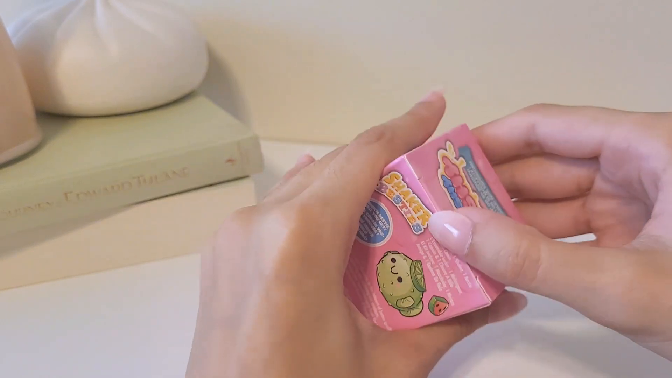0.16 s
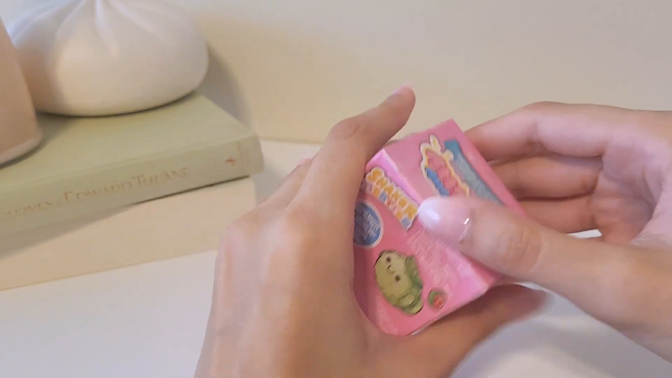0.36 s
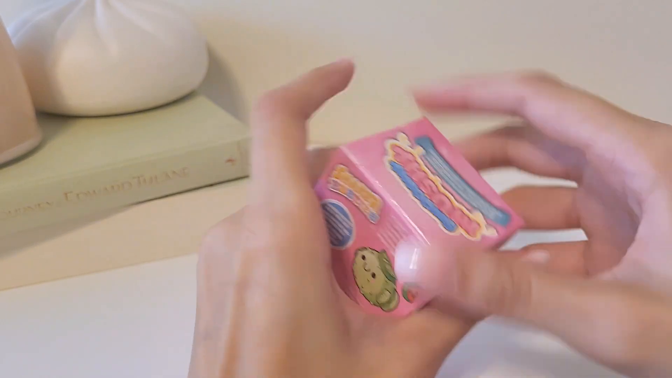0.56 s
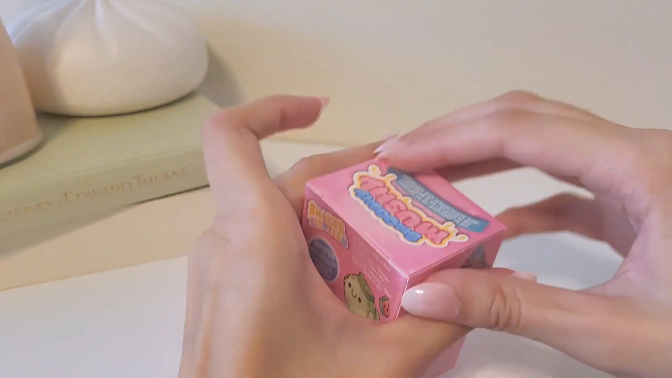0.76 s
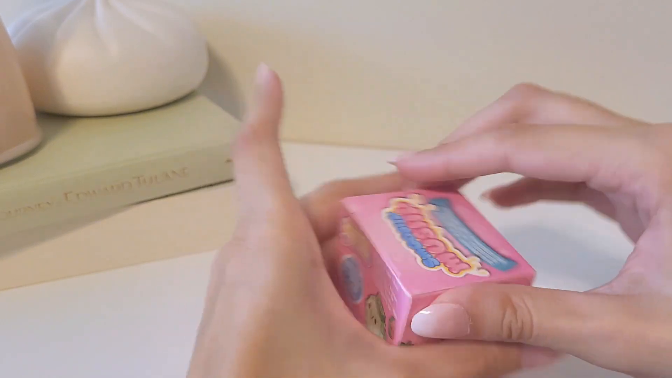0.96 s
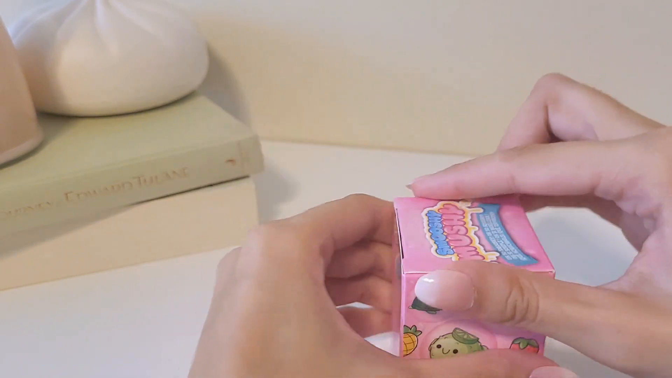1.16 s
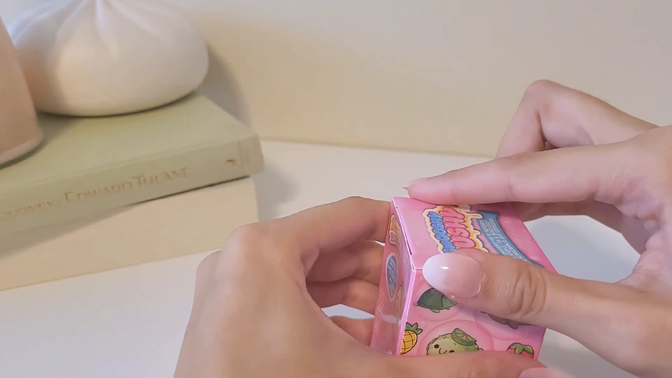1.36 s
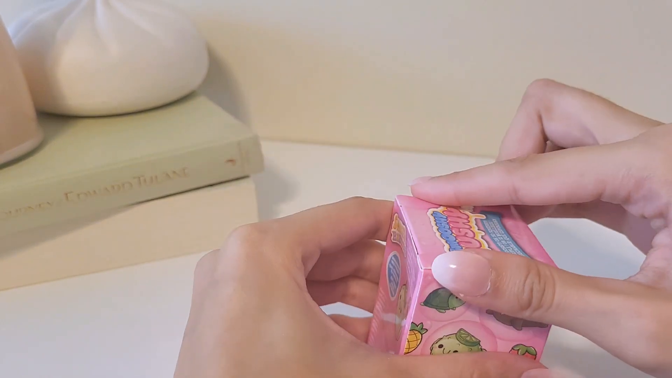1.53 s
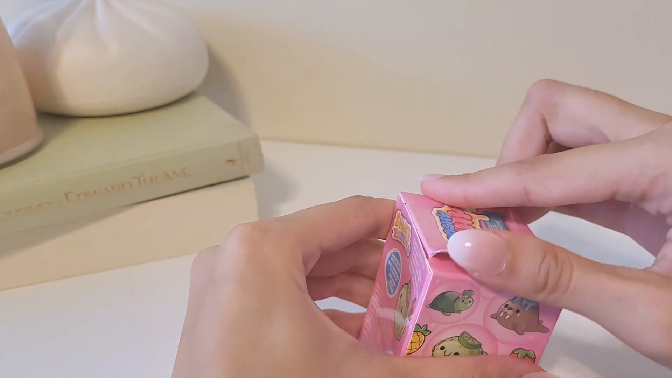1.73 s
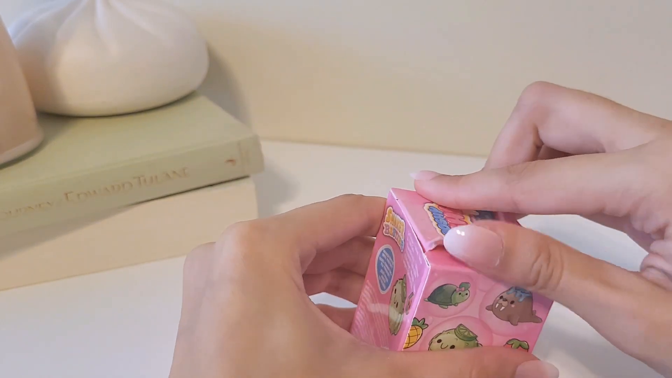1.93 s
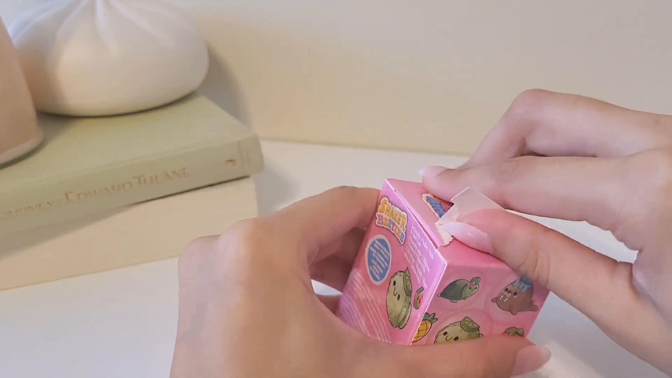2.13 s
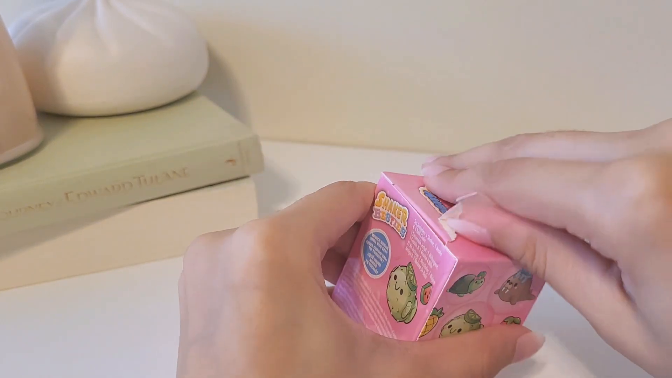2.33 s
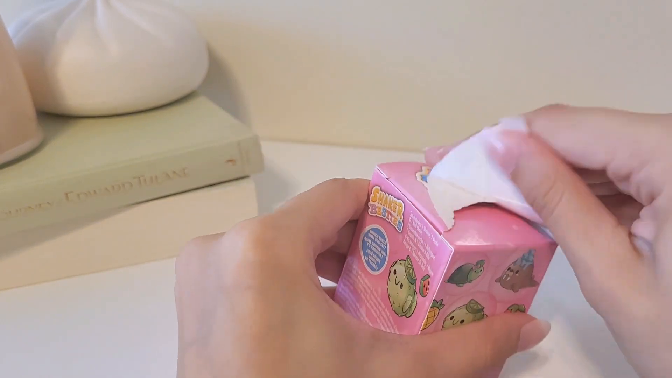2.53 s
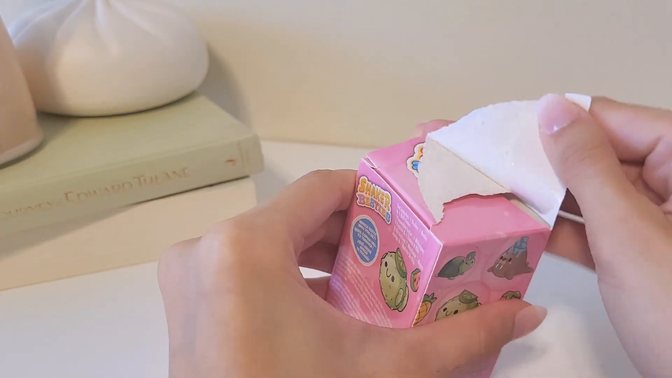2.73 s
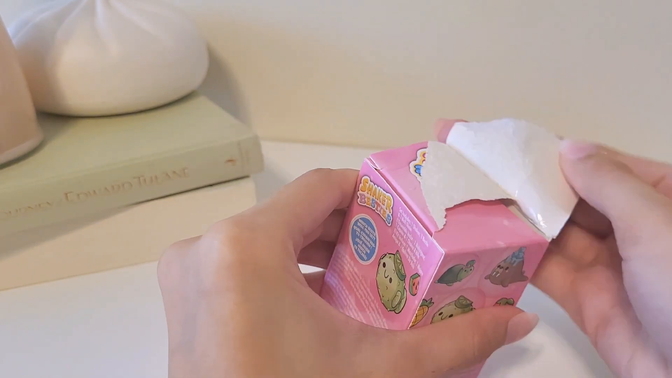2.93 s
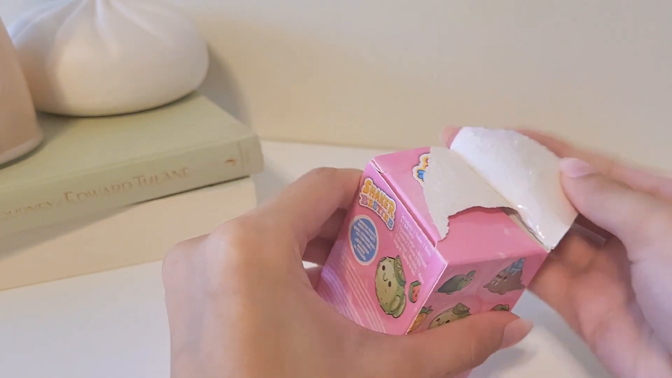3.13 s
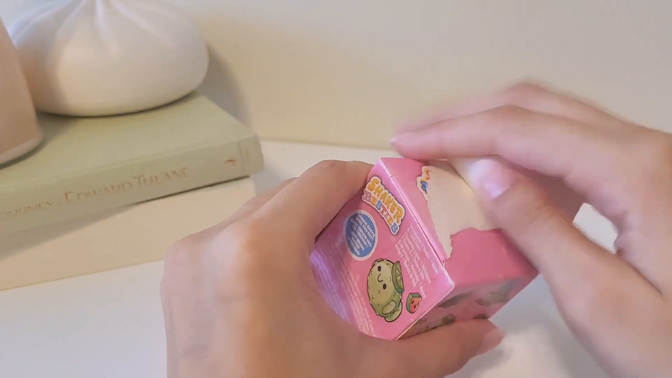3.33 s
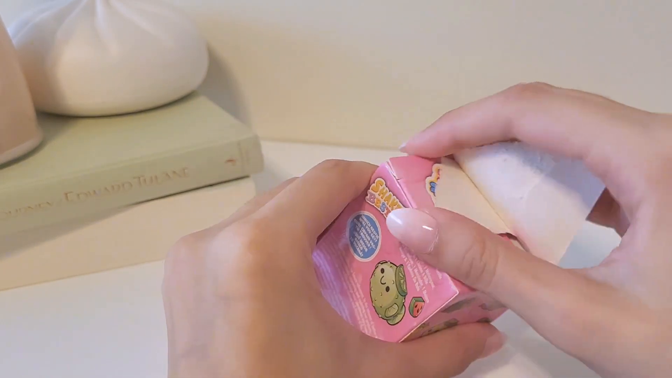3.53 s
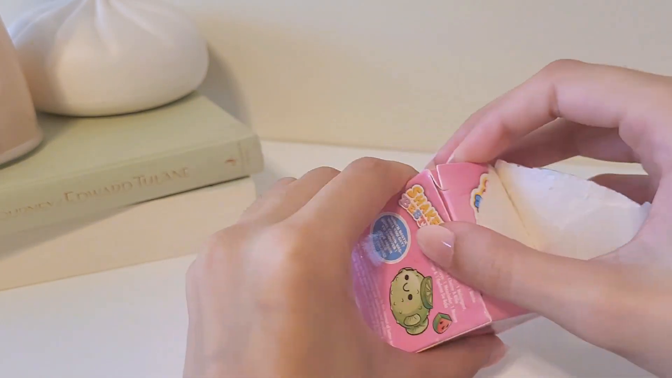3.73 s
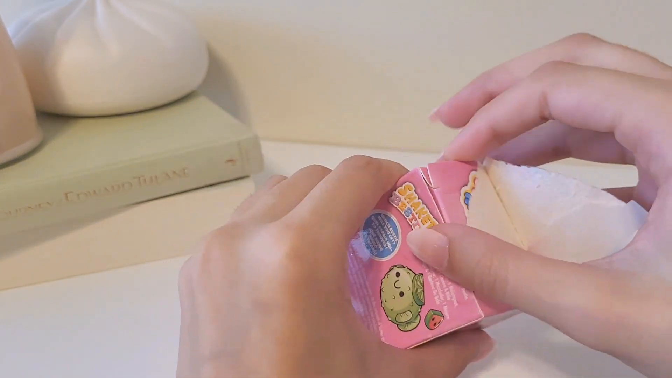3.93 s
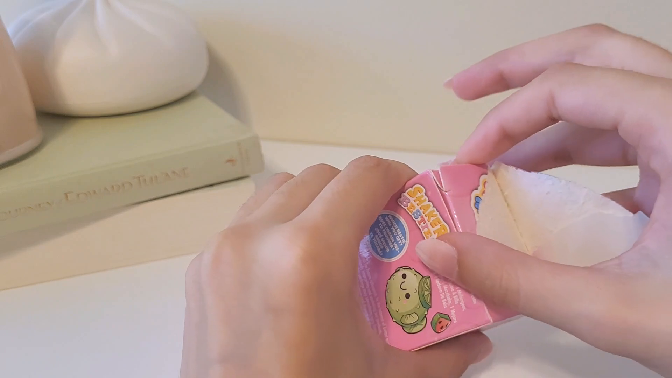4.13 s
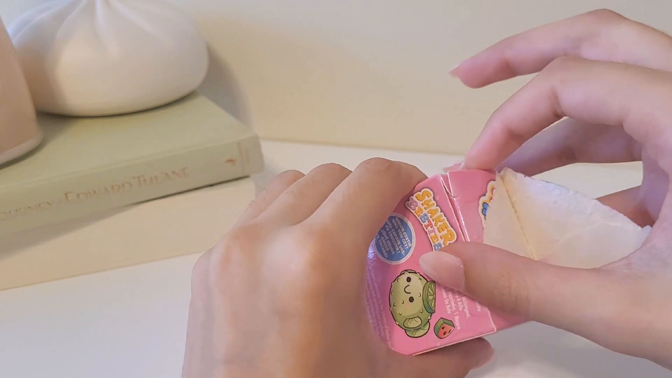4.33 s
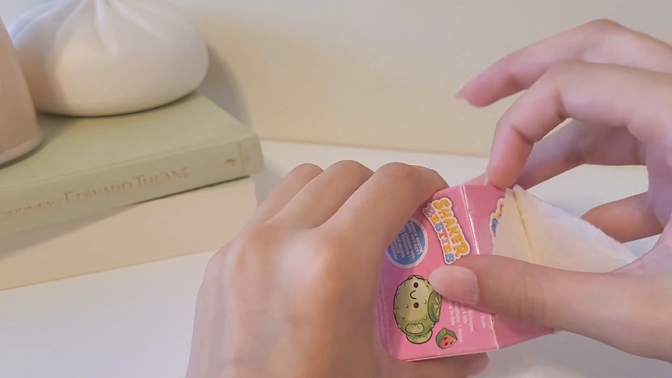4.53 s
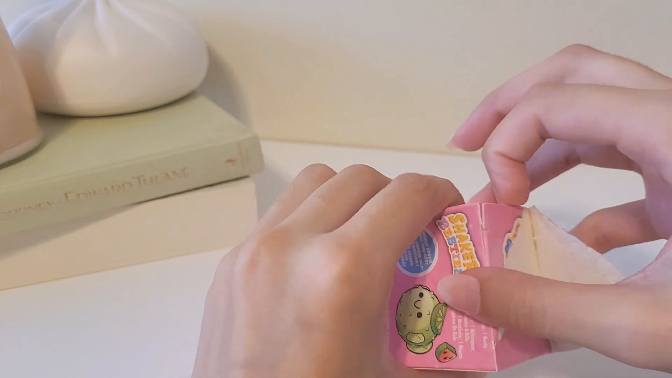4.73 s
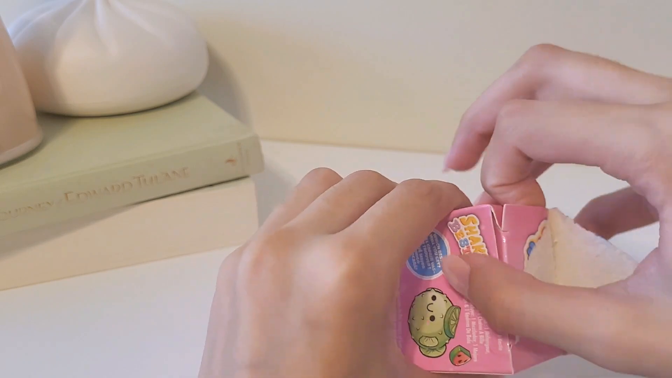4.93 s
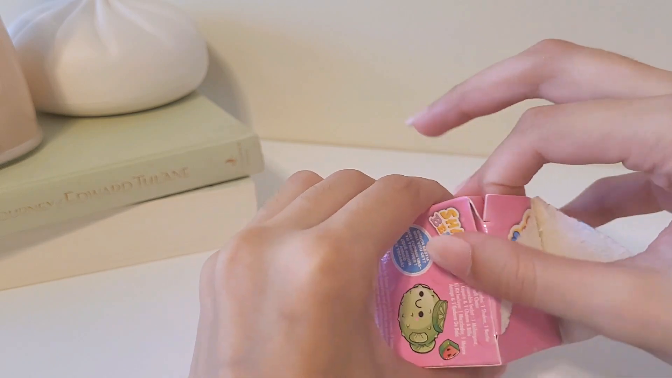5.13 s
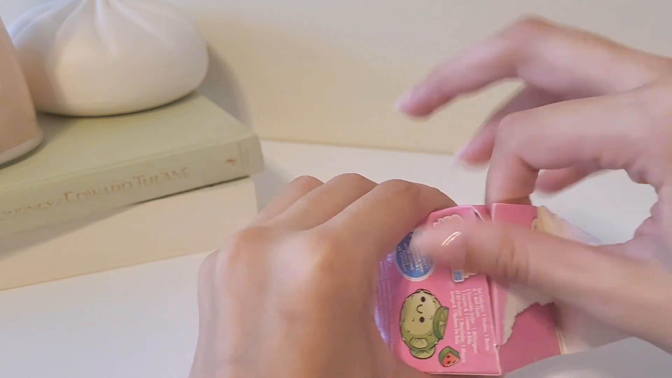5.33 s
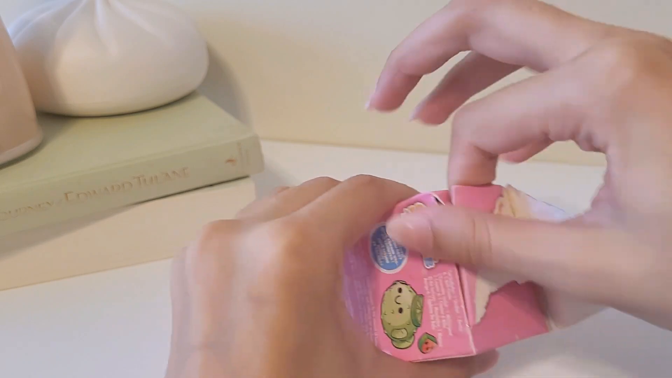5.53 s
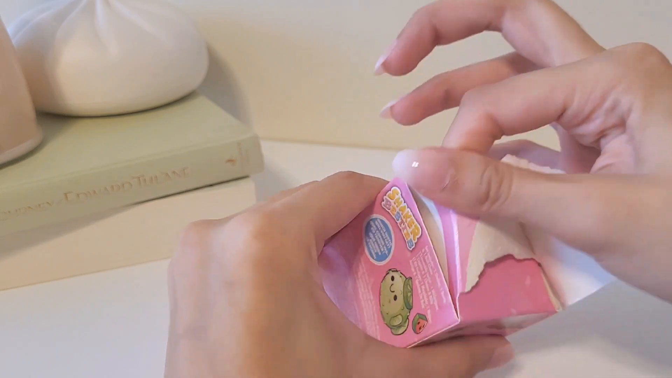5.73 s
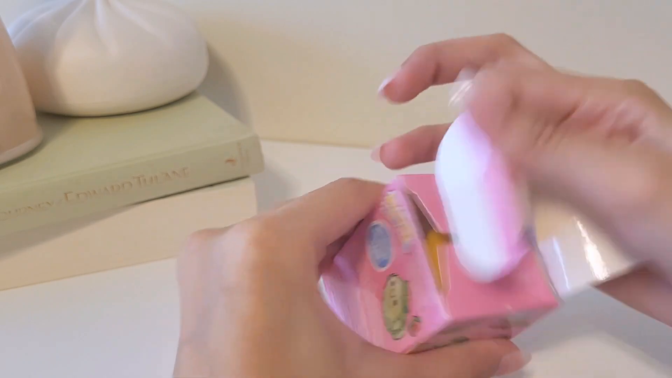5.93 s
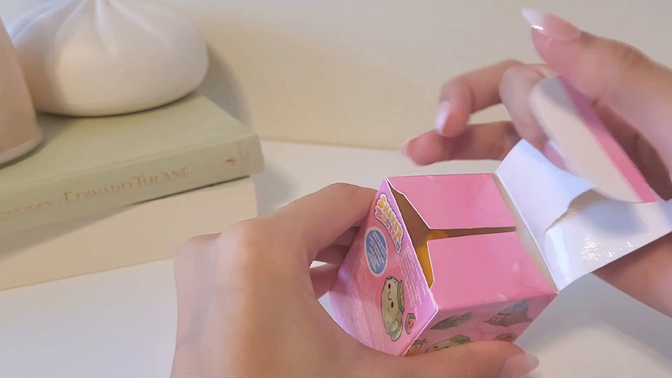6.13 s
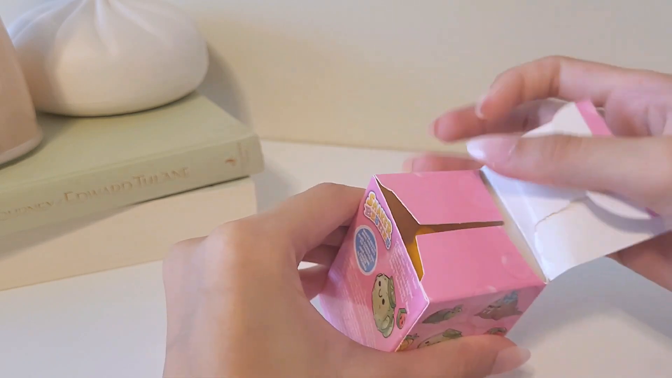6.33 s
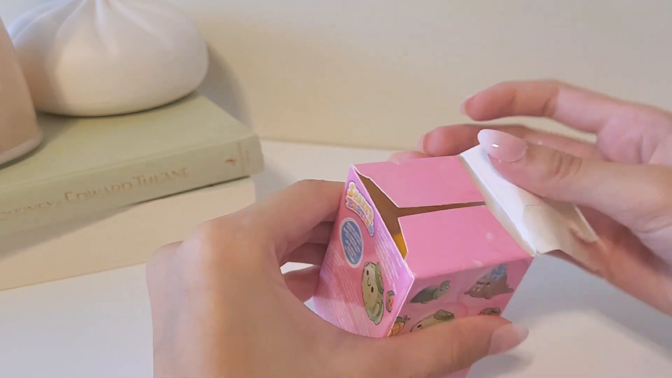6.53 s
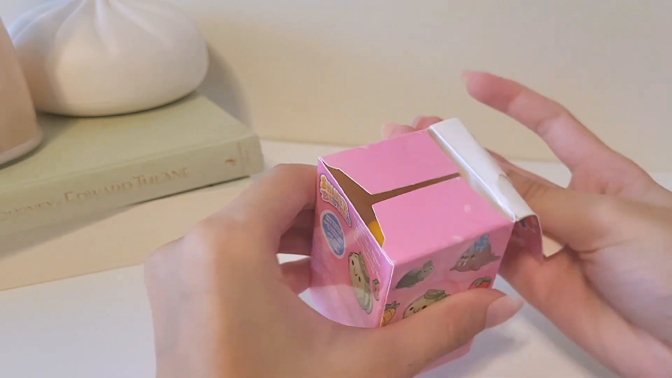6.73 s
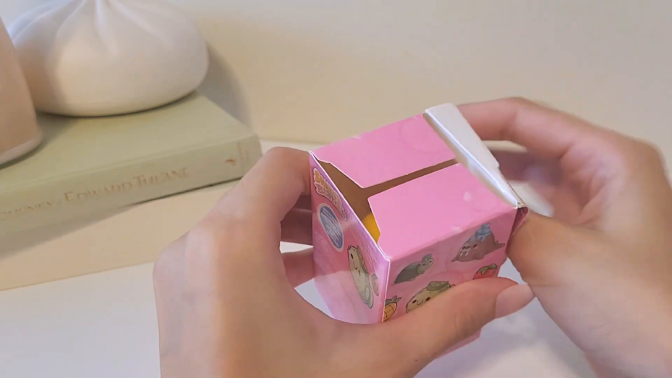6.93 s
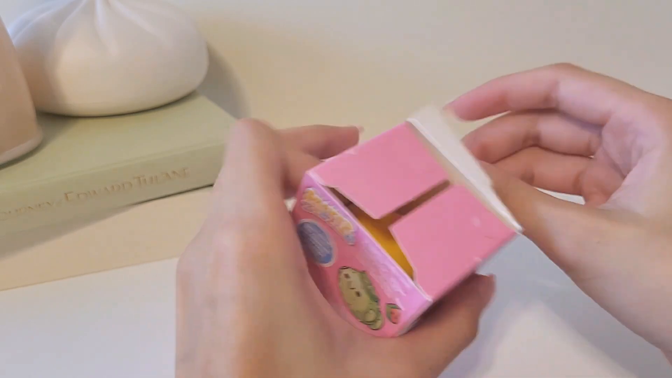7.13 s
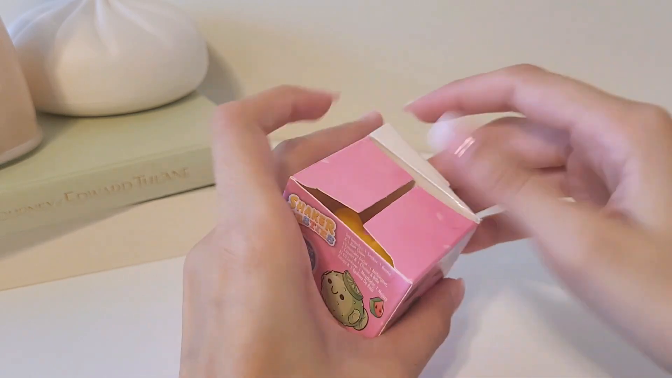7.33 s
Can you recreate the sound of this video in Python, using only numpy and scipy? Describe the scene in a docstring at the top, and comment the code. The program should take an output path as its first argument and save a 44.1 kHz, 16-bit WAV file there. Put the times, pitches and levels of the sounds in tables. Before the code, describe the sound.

Fingers tap and rub a small hollow cardboard box up close, tearing it with two short crackling rips, over faint low rumble and hiss.

```python
"""A far engine gains speed over the first two seconds, over low rumble and faint hiss that run throughout.
Meanwhile fingers tap and rub a small hollow cardboard box close to a stereo microphone in a quiet room.
A crackling rip follows from about 2.3 s, then more taps and rubs, a second rip from 5.5 s, and late taps.
Each contact is noise shaped by an envelope: it rings the air and walls of the box through resonances,
while breaking fibres add bright crackle. The engine is two rising sines; rumble and hiss are filtered noise."""
import sys
import numpy as np
from scipy import signal
from scipy.fft import rfft, irfft, next_fast_len
from scipy.io import wavfile

SR = 44100
rng = np.random.default_rng(int(sys.argv[2]) if len(sys.argv) > 2 else 0)


def to_wav(s):
    """Save 16-bit WAV."""
    ch = np.atleast_2d(s).T  # columns
    pcm = np.round(np.clip(ch, -1, 1) * 32767)  # PCM
    wavfile.write(sys.argv[1], SR, pcm.astype(np.int16))


N = 324620

# taps and snaps: [peak_s, fall_ms, low_box_db, high_box_db, coarse_crackle_db, fine_crackle_db, thump_db]
TAPS = [(0.181, 1.3, -44, -36, -44, -40, -57), (.197, 1.3, -52, -44, -28.5, -21.5, -52),
        (.238, 2, -53, -64, -54, -41, -50), (.252, .8, -56, -60, -46, -32, -55),
        (.347, 1.2, -18.5, -22, -25, -20, -22), (.484, 0.85, -29, -19, -20, -21.5, -29.5),
        (0.577, 1.3, -35, -47, -55, -55, -30), (0.611, 7.7, -34.5, -29.5, -36, -29.5, -36.5),
        (.72, 1.04, -25.5, -22.5, -39, -56, -44), (0.743, 2, -36, -49, -64, -66, -33),
        (0.873, 3.1, -25, -17, -39, -30.5, -13), (0.905, 1.13, -6.5, -10, -10.5, -20.5, -12),
        (0.998, 1.5, -21, -14.5, -25, -36, -22.5), (1.141, 2, -44, -43, -38.5, -47, -54),
        (1.16, 4.5, -40, -61, -65, -57, -34), (1.19, 1.5, -33.5, -30.5, -53, -61, -48),
        (1.26, 1, -32, -34, -35, -33.5, -27), (1.268, 2, -29, -27, -42, -41, -41),
        (1.283, 1.4, -21, -22.5, -32, -44, -51), (1.33, 1.5, -29.5, -56, -64, -63, -39),
        (1.452, 10, -42.5, -64, -73, -68, -47), (1.68, 10.3, -20, -24, -32.5, -26, -26),
        (1.843, 2.3, -56, -62, -53, -35, -40), (1.85, 0.88, -51, -68, -44, -29, -45),
        (1.89, 3.5, -41, -33.5, -34, -15.5, -35), (1.909, 1, -39, -45, -41, -22, -49),
        (1.919, 3, -42, -43, -42, -27, -52), (1.93, 1.3, -44, -47, -29, -16, -44),
        (1.944, 1.8, -30, -26, -27, -16.5, -44), (2.171, 1.5, -45, -35, -81, -46, -58),
        (2.204, 2, -62, -58, -60, -44, -62), (2.296, 2, -70, -68, -68, -47.5, -62.5),
        (2.325, 1.8, -32.5, -35, -35, -31, -48), (2.347, 1.4, -30, -16, -25, -5.5, -31),
        (2.381, 0.76, -45, -34, -16.5, -8.5, -51), (2.423, 1.9, -22.5, -28, -27, -19, -58),
        (2.451, 0.91, -35, -32, -15, -26, -58), (2.481, 1.4, -21, -32, -26, -27, -56),
        (2.514, 0.89, -45, -25, -34, -19, -57), (2.583, 2.5, -41, -30, -24, -30, -53),
        (2.727, 0.6, -14.5, -12, -33, -37, -19), (2.822, 1.3, -43, -21, -41, -39, -47),
        (2.9, 0.72, -21.5, -7.5, -28, -7, -28.5), (2.963, 2, -26, -33, -41, -57, -39),
        (3.036, 1.5, -56, -29, -34, -27, -55), (3.063, .8, -47, -36, -24, -45, -48),
        (3.221, 1.9, -18, -14, -16, -22, -17.5), (3.295, 1.3, -36, -46, -36, -56, -30),
        (3.382, 1.2, -25.5, -39, -41, -49, -38), (3.437, 2.4, -29, -33, -40, -38, -24),
        (3.559, 0.6, -30, -33, -22, -7.5, -41), (3.569, 3.3, -46, -35, -47, -25, -52),
        (3.592, 5.4, -33, -22.5, -29.5, -25, -41), (3.631, 1.2, -25, -27, -23.5, -18, -15.5),
        (3.745, 1.5, -66, -64, -66, -48, -62), (3.973, 0.89, -60, -62, -56, -41.5, -65),
        (4.255, 1.54, -65, -63, -66, -46.5, -57), (4.385, 3.8, -28, -19.5, -31, -12.5, -27),
        (4.402, 2.8, -17.5, -15.5, -25.5, -26, -18.5), (4.48, 2.4, -22, -33, -35.5, -26.5, -27),
        (4.55, 5.1, -46, -38.5, -52, -47, -32), (4.709, 1.4, -34.5, -35, -47, -30, -42),
        (4.845, 10, -45, -35, -45, -41, -31.5), (5.003, 1.9, -59, -39, -54, -45, -31),
        (5.016, 14, -30.5, -29.5, -39, -32.5, -29.5), (5.264, 6.9, -59, -48, -33, -29, -62),
        (5.309, 3, -33, -32, -32.5, -36, -50), (5.388, 1, -70, -64, -66, -41, -62),
        (5.424, .8, -68, -57, -70, -34.5, -58), (5.474, 0.53, -26, -26.5, -61, -39, -55),
        (5.544, 1.5, -31, -20, -40, -21, -45), (5.563, 2, -14, -8.5, -28, -12.5, -18),
        (5.606, .8, -42, -37, -25, -16, -40), (5.626, 3, -20, -22, -20, -12.5, -40),
        (5.655, 2.3, -40, -39, -29, -15, -33), (5.678, 2.1, -12, -25, -29, -17, -35),
        (5.701, 1.3, -26, -17, -30, -32, -27), (5.875, 1.8, -34, -15, -26, -44, -27),
        (5.897, 1.4, -23, -27, -6.5, -29, -20.5), (6.067, 1.8, -37, -43, -26, -25, -48),
        (6.335, 0.86, -36, -28, -64, -42, -30), (6.439, 2.3, -45.5, -28.5, -45, -31, -58),
        (6.624, 1.3, -16, -16, -11, -10, -24.5), (6.826, 2.1, -35, -30, -18, -19.5, -56),
        (6.841, 1.9, -27, -22, -27, -30, -57), (6.91, 1.4, -43, -33.5, -55, -55, -59),
        (7.019, 2.6, -21, -21, -29, -33, -53), (7.04, .8, -33, -25, -25, -20, -48),
        (7.061, 2, -30, -35, -25, -40, -25), (7.08, 2.4, -24.5, -15, -21, -24, -32),
        (7.11, 1.2, -40, -28, -24, -41, -45), (7.137, 1.1, -31, -23, -45, -53, -27)]
# scuff around each tap, relative to it: [offset_db] for low box, high box, coarse, fine, thump
SCUFF_OFFSETS = [-25, -25.5, -20, -24.5, -20]
# rubs and short pulls: [peak_s, rise_ms, fall_ms, low_box_db, high_box_db, fine_crackle_db]
RUBS = [(.204, 12, 35, -64, -62, -47), (.523, 6, 4.2, -43, -31.5, -45), (.645, 26, 35, -37.5, -38, -37.5),
        (.7, 15, 20, -55, -58, -70), (0.779, 8.8, 5.1, -39, -39.5, -49), (0.946, 8.2, 38, -39, -38, -38.5),
        (1.069, 17.6, 14, -25.5, -23, -45), (1.29, 11, 22, -35, -46, -54), (1.641, 14, 42, -62, -45, -63),
        (1.91, 8, 33, -48, -40, -26), (1.945, 8.9, 15.4, -26.5, -22, -20), (1.981, 6, 17.5, -31, -29, -25),
        (2.018, 7.1, 8, -38, -44, -42), (2.223, 36, 24, -55, -58, -63), (2.38, 6, 0.87, -44, -32, -17),
        (2.549, 6.3, 3.3, -48, -9, -42), (2.883, 7.5, 6.5, -36, -36, -29), (3.129, 11, 2, -50, -27.5, -30),
        (3.19, 55, 22, -45.5, -42, -46.5), (3.25, 27, 39.5, -29, -29.5, -30),
        (3.361, 14, 11, -42, -40, -42.5), (3.455, 35, 18, -47, -52, -64),
        (3.632, 9.1, 1.5, -26.5, -22.5, -25), (3.649, 28, 17.5, -36, -33, -44),
        (3.505, 10, 12, -71, -68, -40.5), (3.8, 30, 20, -56, -46, -77), (3.87, 41, 35, -54.5, -45.5, -85),
        (3.915, 25, 15, -57, -49.5, -87), (4.0, 13, 20, -53.5, -47.5, -75), (4.385, 7.9, 2, -40, -43, -42),
        (4.419, 8, 22, -48, -51, -50), (4.478, 4, 1, -33, -38, -43), (4.62, 44, 7.9, -48, -48, -70),
        (4.838, 4, 2.1, -40, -16, -27), (4.87, 28, 28, -48, -40.5, -52), (4.922, 16, 11, -45.5, -43, -77),
        (5.175, 12, 5.4, -41, -38, -80), (5.11, 19, 14, -57, -77, -50), (5.29, 18, 48, -52, -47, -54),
        (5.573, 12, 11.6, -28.5, -25, -22.5), (5.886, 16, 10, -29, -17.5, -31.5),
        (5.907, 10.2, 1.7, -17.5, -7.5, -15.5), (6.03, 9, 7.6, -64, -53, -58),
        (6.067, 4, 1.7, -43, -40.5, -29), (6.202, 14.5, 9.7, -45.5, -39, -52),
        (6.26, 17.5, 17.5, -42, -36.5, -39.5), (6.607, 14, 8.2, -48.5, -41.5, -37),
        (6.743, 36, 25, -50.5, -49, -44.5), (6.961, 8.3, 19, -43.5, -40, -37),
        (7.045, 16.2, 2.5, -23.5, -13.5, -19.5), (7.05, 14, 35, -50, -36, -31),
        (7.208, 3.1, 1.36, -20.5, -7.5, -15.5), (7.23, 24, 25, -34.5, -36, -39)]
# hands shifting on the box throughout: [time_s, box_ring_db, fine_crackle_db, wall_flex_db]
HOLD = [(0, -44, -46, -42.5), (.095, -71, -65, -62), (.17, -63, -52.5, -54), (.47, -56.5, -58, -49.5),
        (1.1, -64, -54.5, -47), (1.45, -62, -74, -48), (1.8, -62.5, -62, -54), (2.1, -46.5, -61, -55.5),
        (2.24, -59.5, -64, -59.5), (2.3, -70, -62, -63), (3.0, -73, -50.5, -67), (3.5, -60, -57, -52),
        (3.75, -71, -70.5, -61), (4.3, -80, -66.5, -62), (4.5, -56.5, -58, -52.5),
        (4.7, -62.5, -65.5, -52.5), (5.2, -57, -51, -54), (5.45, -67, -58.5, -62.5),
        (6.15, -68, -57.5, -63), (6.35, -57.5, -48.5, -67), (6.55, -69.5, -55, -70),
        (7.36, -52, -56.5, -52.5)]
# the two rips, one curve each: [time_s, low_box_db, high_box_db, coarse_crackle_db, fine_crackle_db]
RIPS = [
    [(2.32, -56, -57, -62, -44), (2.343, -48, -54, -54, -50), (2.367, -33, -37, -30.5, -25.5),
     (2.41, -40, -31, -26, -25), (2.46, -29, -28.5, -23, -22), (2.56, -31, -20, -24, -21.5),
     (2.63, -34.5, -31, -26, -23), (2.67, -30.5, -22.5, -22, -18.5), (2.754, -38, -49, -35, -33),
     (2.83, -45.5, -34.5, -35, -28), (2.897, -38, -46, -28, -29), (2.94, -53.5, -59, -43, -47.5),
     (3.06, -64, -64, -52, -47)],
    [(5.5, -65, -64, -60, -68), (5.53, -40, -39, -61, -66), (5.565, -33, -25, -36, -28.5),
     (5.635, -51.5, -47, -46, -37), (5.69, -21, -20.5, -19.5, -29), (5.735, -36.5, -38, -38.5, -46),
     (5.8, -28.5, -24, -30.5, -35.5), (5.86, -38, -32.5, -32, -47), (5.925, -39.5, -37.5, -48, -38),
     (6.06, -54, -49, -50, -61), (6.142, -77, -64, -75, -83)],
]
# wall flex against the low box layer, one per rip; the second bends the whole lid: [offset_db]
RIP_FLEX = [-30, -4]
# box air and panels, low group: [pitch_hz, width_hz, level_db]
BOX_LOW_MODES = [(474, 120, -5.5), (592, 148, -6.5), (813.4, 166, 4.5), (981, 77, -9.5)]
# box air and panels, high group: [pitch_hz, width_hz, level_db]
BOX_HIGH_MODES = [(1322, 302, -2), (1522, 195, 4), (1576, 80, -6)]
# low flexing of the walls: [pitch_hz, width_hz, level_db]
WALL_MODES = [(206.7, 53.4, 3), (290, 142, -0.5), (379.7, 124, -3)]
# flap modes behind the coarse crackle: [pitch_hz, width_hz, level_db]
FLAP_MODES = [(1852, 480, -9.5), (2456, 420, 3), (2837, 150, -7), (3250, 280, -2), (3763, 580, -3),
              (4920, 4050, 9.5)]
# colour of the fine fibre crackle: [freq_hz, relative_density_db_per_hz]
FIBRE_COLOUR = [(3500, -28), (5000, -2), (6500, 0), (7500, 1), (9500, -2), (11600, -13), (15200, -6),
                (16000, -7)]
# fibre crackle balance, as the right capsule faces the box: [freq_hz, left_minus_right_db]
FIBRE_BALANCE = [(4400, 6), (8000, -14), (15000, -11.5)]
# level of the crackle's top over time: [time_s, level_db]
CRACKLE_TOP = [(0, -1.5), (1.5, -1.5), (2.0, 2.5), (3.2, 2.5), (3.7, -4), (5.2, -1), (6.1, 0.5), (6.7, -2),
               (7.36, -8)]
# the box moving across the stereo image: [time_s, left_minus_right_db]
BOX_SIDE = [(0, 2.5), (1.3, 0.5), (1.9, 0.5), (2.7, 1), (3.3, 2.5), (4.6, 1.5), (5.6, 0.5), (6.6, 0.5),
            (7.36, 2)]
# far engine: [time_s, first_order_db, second_order_db]
ENGINE = [(0, -49, -43), (.1, -34.5, -37), (.28, -38, -38), (.33, -29.5, -39.5), (.68, -30, -43.5),
          (.9, -33, -42), (.98, -33, -54), (1.07, -45, -53), (1.25, -33.5, -48), (1.63, -33, -59),
          (1.69, -52, -46), (1.91, -30.5, -52), (2.1, -65, -56)]
# rumble level over time: [time_s, level_db]
RUMBLE = [(0, -44), (.3, -36), (1.4, -36.5), (1.93, -39.5), (2.09, -50), (2.26, -42), (2.58, -47.5),
          (2.71, -39.5), (2.87, -37), (2.95, -50), (3.22, -45.5), (3.4, -30.5), (3.89, -45), (4.24, -40.5),
          (4.63, -38), (4.78, -49.5), (5.14, -33.5), (5.45, -57.5), (5.56, -37.5), (5.9, -40.5),
          (6.17, -52), (6.35, -40), (6.87, -62), (7.03, -47), (7.36, -46)]
# low room resonances: [pitch_hz, width_hz, level_db]
RUMBLE_MODES = [(62.9, 10, 1), (81, 12, -1), (130.7, 18, -5.5), (33, 12, -7)]
# colour of the floor: [freq_hz, relative_density_db_per_hz]
HISS_COLOUR = [(15, -51), (25, -21), (47, -2), (68, 1.5), (130, -17.5), (190, -29.5), (236, -37),
               (270, -25.5), (354, -30.5), (384, -53), (641, -36.5), (11300, -50), (16000, -44.5)]
# stereo likeness of the floor: [freq_hz, likeness_0_to_1]
HISS_LIKENESS = [(60, 0.43), (130, 0.79), (290, 0.2), (640, 0), (1400, 0.0)]

TAP_RISE_MS, TAP_RISE_SHARE = 0.35, 0.1   # rise = this many ms plus a share of the fall
SCUFF_RISE_MS, SCUFF_FALL_MS = 3.5, 27.6   # the finger loads the card before a tap and scuffs on after it
RUB_ROUNDNESS = 1.3   # 1 = pointed swell, 2 = bell
GRAINY_MS = 39   # rubs this long are all grain, shorter ones partly one solid slip
HOLD_LOW_DB, RUB_FLEX_DB = -8, -15.5   # holding: low box against high; rubs: wall flex against low box
COARSE_SHARE, COARSE_OFFSET_DB = 0.58, -3.5   # coarse level lies between high box (0) and fine crackle (1)
# grain rates are multiplied by the clumping
RUB_PER_S, RUB_SPREAD_DB, RUB_CLUMP_DB = 500, 2, 3.5
CRACKLE_PER_S, CRACKLE_SPREAD_DB, CRACKLE_CLUMP_DB = 550, 3, 1.5
GRAIN_MS, STEADY_SHARE = 0.74, 0.99
LOW_LIKENESS, HIGH_LIKENESS, COARSE_LIKENESS, ROOM_LIKENESS = .93, .8, .55, .7   # left against right
TOP_HZ = 10500
LEFT_LAG_SAMPLES = 2   # the left capsule hears the box later
ROOM_DB, ROOM_T60_S, WALL_CUT_HZ = -15, .2, 6000
ENGINE_START_HZ, ENGINE_RISE_HZ_PER_S, ENGINE_FADE_S = 69.7, 3.934, .064
HISS_DB = -52.5
CUTOFF_HZ = 16700


def cardboard():
    """Slips and taps drive the box modes, the walls and two sizes of fibre crackle."""
    (tap_low, tap_high, tap_coarse, tap_fine, tap_thump), grainy = contacts()
    low, high, coarse, fine, flex = strokes() + grainy
    rub = grains(RUB_PER_S, RUB_SPREAD_DB, from_db(RUB_CLUMP_DB * drift(25)))
    # each crackle size clumps in its own time
    coarse_grains, fine_grains = [
        grains(CRACKLE_PER_S, CRACKLE_SPREAD_DB, from_db(CRACKLE_CLUMP_DB * drift(40))) for _ in range(2)]

    air = wandering(pair(LOW_LIKENESS) * (low * rub + tap_low), BOX_LOW_MODES, wander_db=3.5)
    air = air + resonate(pair(HIGH_LIKENESS) * (high * rub + tap_high), BOX_HIGH_MODES)
    ring = butter_band(air, 3, [380, 2000])   # a small box rings in a narrow range
    walls = resonate(pair(LOW_LIKENESS) * (flex * rub + tap_thump), WALL_MODES)

    snaps = wandering(pair(COARSE_LIKENESS) * (coarse * coarse_grains + tap_coarse), FLAP_MODES, wander_db=0.5)
    snaps = butter_band(snaps, 2, [1600, 6000])
    fibres = fibre_crackle(fine * fine_grains + tap_fine)

    left, right = (ring + walls + snaps + fibres) * panned(in_time(BOX_SIDE))
    return np.array([np.roll(left, LEFT_LAG_SAMPLES), right])


def contacts():
    """Taps are sharp spikes inside a scuff, rubs rounded swells; solid and grainy envelopes per layer."""
    solid, grainy = np.zeros((2, 5, N))
    for s, fall_ms, *levels_db in TAPS:
        at, spike = swell(s, TAP_RISE_MS + TAP_RISE_SHARE * fall_ms, fall_ms, levels_db, power=0.81)
        solid[:, at] += spike
        scuff_db = np.add(levels_db, SCUFF_OFFSETS)
        at, scuff = swell(s, SCUFF_RISE_MS, SCUFF_FALL_MS, scuff_db, power=0.74)
        grainy[:, at] += scuff
    for s, rise_ms, fall_ms, low_db, high_db, fine_db in RUBS:
        levels_db = layers(low_db, high_db, fine_db, low_db + RUB_FLEX_DB)
        at, rub = swell(s, rise_ms, fall_ms, levels_db, RUB_ROUNDNESS)
        grain_share = min((rise_ms + fall_ms) / GRAINY_MS, 1)
        solid[:, at] += (1 - grain_share) * rub
        grainy[:, at] += grain_share * rub
    return solid, grainy


def strokes():
    """Holding and rips: slow envelopes of the same five layers."""
    ring_db, fine_db, flex_db = in_time(HOLD)
    out = from_db(layers(ring_db + HOLD_LOW_DB, ring_db, fine_db, flex_db))
    t = np.arange(N) / SR
    for rip, flex_offset_db in zip(RIPS, RIP_FLEX):
        levels_db = in_time(rip)
        low_db = levels_db[0]
        ripping = (t > rip[0][0]) & (t < rip[-1][0])
        out += from_db(levels_db + [low_db + flex_offset_db]) * ripping
    return out


def fibre_crackle(envelope):
    """Breaking fibres: bright unrelated left and right noise whose top rises and falls in level."""
    def colour_db(hz):
        balance_db = np.outer([.5, -.5], at_hz(FIBRE_BALANCE, hz))
        return at_hz(FIBRE_COLOUR, hz) + balance_db

    fibres = coloured(pair(0) * envelope, colour_db)
    top = signal.sosfiltfilt(signal.butter(3, TOP_HZ, "high", fs=SR, output="sos"), fibres)
    return fibres + (from_db(in_time(CRACKLE_TOP)) - 1) * top


def layers(low_db, high_db, fine_db, flex_db):
    """Levels of the low, high, coarse, fine and flex layers; coarse follows from high and fine."""
    coarse_db = high_db + COARSE_SHARE * (fine_db - high_db) + COARSE_OFFSET_DB
    return np.array([low_db, high_db, coarse_db, fine_db, flex_db])


def swell(s, rise_ms, fall_ms, levels_db, power):
    """One rise and fall around s, laid on each layer at its own level."""
    first = max(round(s * SR) - SR // 6, 0)
    last = min(round(s * SR) + SR // 3, N)
    at = np.arange(first, last)
    ms = (at / SR - s) * 1000
    away = np.where(ms < 0, -ms / max(rise_ms, .1), ms / max(fall_ms, .2))
    return at, np.outer(from_db(levels_db), np.exp(-away ** power))


def grains(per_s, spread_db, clumps):
    """Envelope of random short slips of uneven size over a steady share; rms 1."""
    sizes = from_db(spread_db * np.minimum(rng.exponential(1, N), 4))
    born = rng.random(N) < per_s * clumps / SR
    r = np.exp(-1000 / (GRAIN_MS * SR))
    slips = signal.lfilter([1], [1, -2 * r, r * r], sizes * born + 1e-18)
    return rms_one(rms_one(slips) + STEADY_SHARE)


def wandering(x, modes, wander_db):
    """Each mode's level wanders slowly at random, so the ring and crackle vary in colour."""
    shares = from_db(np.array(modes)[:, 2])
    rings = [share * from_db(wander_db * drift(14.0)) * resonate(x, [mode])
             for share, mode in zip(shares, modes)]
    return sum(rings) / np.sqrt(np.sum(shares ** 2))


def room(x):
    """A dense decaying tail, partly alike in the two channels, dull at the top."""
    t = np.arange(SR // 2) / SR
    tail = pair(ROOM_LIKENESS)[:, :len(t)] * from_db(-60 * t / ROOM_T60_S) * (t > .004)
    dull = np.exp(-2 * np.pi * WALL_CUT_HZ / SR)
    tail = signal.lfilter([1 - dull], [1, -dull], tail)
    tail = tail / np.sqrt(np.sum(tail ** 2, axis=1, keepdims=True))
    return signal.fftconvolve(x, tail, axes=1)[:, :N]


def engine():
    """Two firing orders of a far engine gaining speed, faded out by the last row of its table."""
    first_db, second_db = in_time(ENGINE)
    t = np.arange(N) / SR
    turn = 2 * np.pi * (ENGINE_START_HZ * t + ENGINE_RISE_HZ_PER_S * t ** 2 / 2)
    fade = np.clip((ENGINE[-1][0] - t) / ENGINE_FADE_S, 0, 1)
    orders = from_db(first_db) * np.sin(turn) + from_db(second_db) * np.sin(2 * turn)
    return np.sqrt(2) * fade * orders   # root two makes the table levels rms


def rumble():
    """Traffic-like noise held in the low room resonances, passed twice to narrow them."""
    level_db, = in_time(RUMBLE)
    held = resonate(resonate(pair(0.91), RUMBLE_MODES), RUMBLE_MODES)
    return from_db(level_db) * rms_one(held)


def hiss():
    """Room and microphone floor above 95 Hz, much alike at the bottom, nearly unrelated in the treble."""
    mid, side = rng.standard_normal((2, 1, N))
    size = next_fast_len(N)
    hz = np.fft.rfftfreq(size, 1 / SR)
    alike = np.clip(at_hz(HISS_LIKENESS, hz), 0, 1)
    mid_part = rfft(mid, size) * np.sqrt(1.001 + alike)
    side_part = rfft(side, size) * np.sqrt(1.001 - 0.89 * alike)
    both = mid_part + side_part * [[1], [-1]]
    floor = irfft(both * from_db(at_hz(HISS_COLOUR, hz)) * (hz > 95), size)[:, :N]
    return from_db(HISS_DB) * rms_one(floor)


def from_db(db):
    """Decibels to gain."""
    return 10 ** (np.asarray(db) / 20)


def rms_one(x):
    """Scale to rms 1."""
    return x / np.sqrt(np.mean(x ** 2) + 1e-20)


def in_time(rows):
    """Table columns as curves over all samples."""
    s, *columns = np.transpose(rows)
    return [np.interp(np.arange(N) / SR, s, c) for c in columns]


def at_hz(points, hz):
    """Read a table on a log-frequency axis."""
    table_hz, values = np.array(points).T
    return np.interp(np.log(hz + 1), np.log(table_hz), values)


def drift(rate_hz):
    """Slow random wander of rms 1: noise through a two-pole low-pass, past its first second."""
    r = np.exp(-2 * np.pi * rate_hz / SR)
    return rms_one(signal.lfilter([1], [1, -2 * r, r * r], rng.standard_normal(N + SR))[SR:])


def pair(alike):
    """Two white noises with a given likeness."""
    mid, side = rng.standard_normal((2, N))
    alike = np.clip(alike, 0, 1)
    return (np.sqrt(1 + alike) * mid + np.sqrt(1 - alike) * side * [[1], [-1]]) / np.sqrt(2)


def panned(pan_db):
    """Left and right gains from a left-minus-right level."""
    return from_db(np.outer([.5, -.5], pan_db))


def butter_band(x, order, edges_hz):
    """Keep only the band between two edges."""
    return signal.sosfilt(signal.butter(order, edges_hz, "band", fs=SR, output="sos"), x)


def coloured(x, gain_db):
    """Stereo filter from a function Hz -> dB; white noise of rms 1 keeps rms 1."""
    size = next_fast_len(N)
    gain = from_db(gain_db(np.fft.rfftfreq(size, 1 / SR)))
    return irfft(rfft(x, size) * rms_one(gain), size)[:, :N]


def resonate(x, modes):
    """Parallel resonances with alternating signs; white noise of rms 1 keeps rms 1."""
    click = np.zeros(x.shape[:-1] + (4000,))   # a test click ahead of the sound gives the filter's energy
    click[..., 0] = 1
    driven = np.concatenate([click, x], -1)
    out = 0
    for k, (hz, width_hz, level_db) in enumerate(modes):
        r = np.exp(-np.pi * width_hz / SR)
        poles = [1, -2 * r * np.cos(2 * np.pi * hz / SR), r * r]
        gain = (-1) ** k * from_db(level_db) * (1 - r * r)
        out = out + gain * signal.lfilter([1, 0, -1], poles, driven)
    return out[..., 4000:] / np.sqrt(np.sum(out[..., :4000] ** 2, axis=-1, keepdims=True))


def scene():
    """Box near the microphone, room tail, far engine and rumble, and floor."""
    box = cardboard()
    far = (engine() + rumble()) * panned(1.2)
    return box + from_db(ROOM_DB) * room(box) + far + hiss()


def record(dry):
    """Peaks are rounded towards 0.95 of full scale, then the top is cut steeply."""
    rounded = dry / (1 + (dry / .95) ** 4) ** .25
    return signal.sosfilt(signal.cheby2(18, 85, CUTOFF_HZ, fs=SR, output="sos"), rounded)


dry = scene()
out = record(dry)
to_wav(out)
```